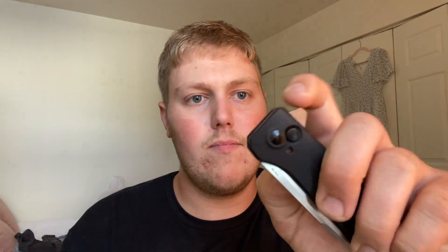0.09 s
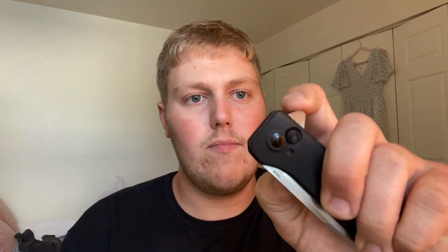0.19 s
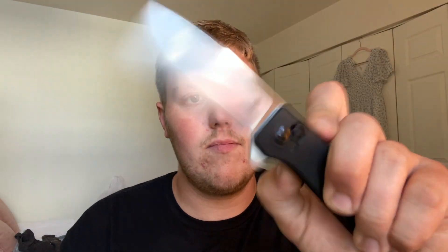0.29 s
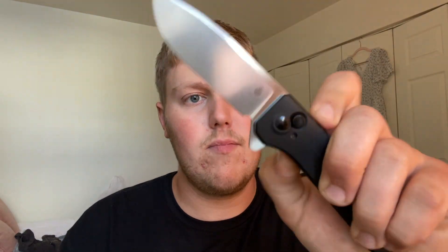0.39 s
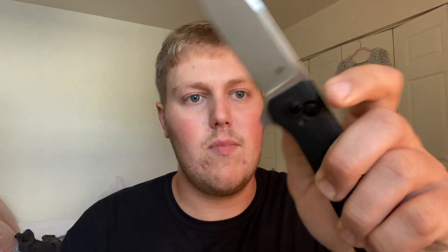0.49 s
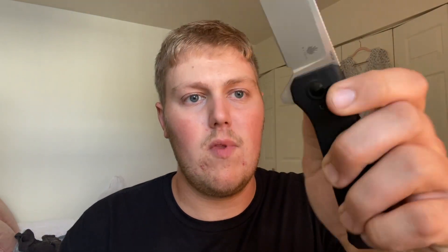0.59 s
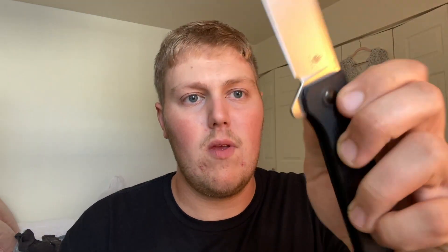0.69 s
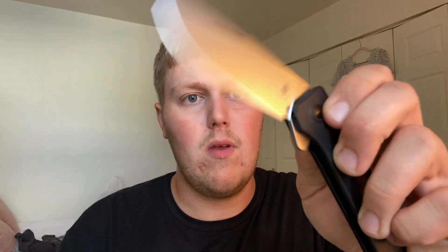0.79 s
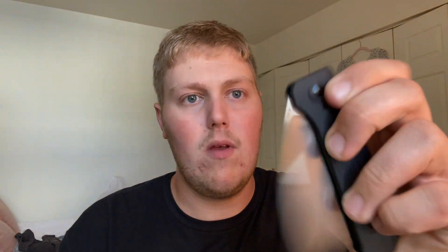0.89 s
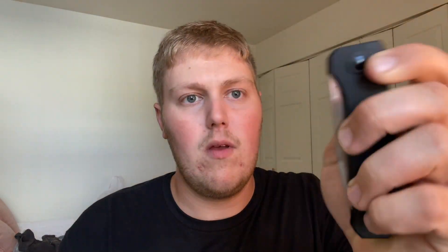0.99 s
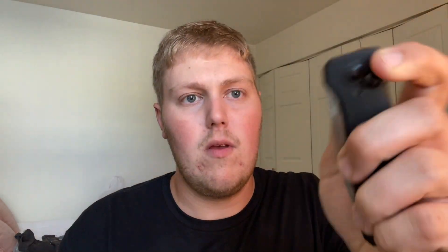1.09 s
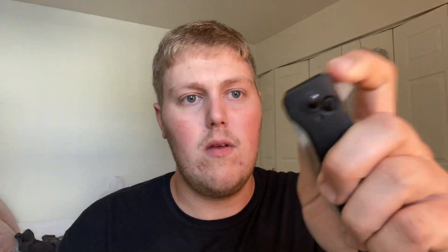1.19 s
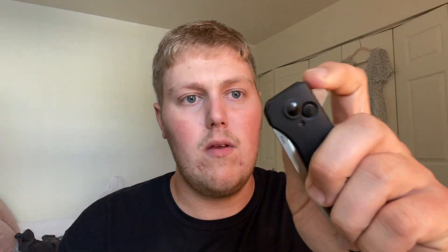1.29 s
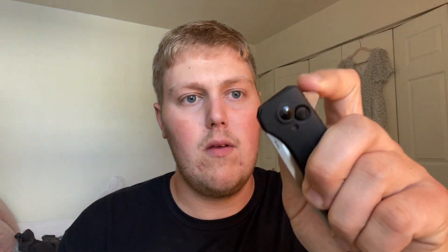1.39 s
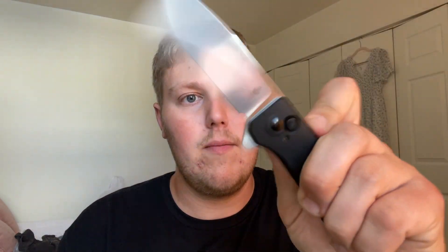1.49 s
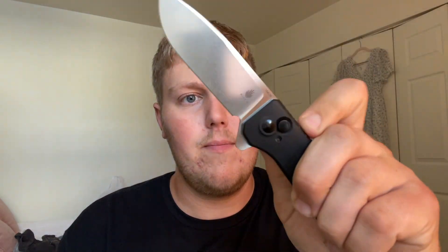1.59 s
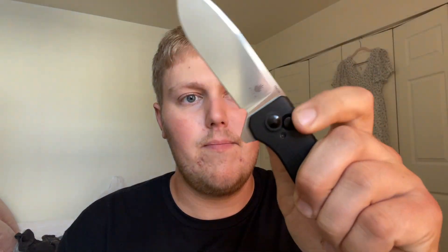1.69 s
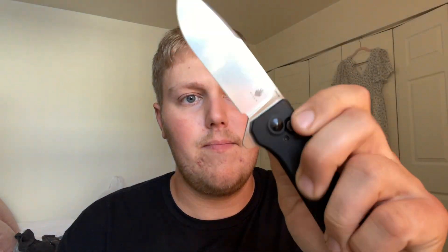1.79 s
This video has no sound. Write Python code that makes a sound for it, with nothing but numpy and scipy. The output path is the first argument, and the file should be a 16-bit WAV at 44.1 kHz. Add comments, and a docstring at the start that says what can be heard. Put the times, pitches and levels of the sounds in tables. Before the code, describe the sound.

Sharp steel clicks of a pocket knife snapping open, closing, then snapping open in a small room

```python
"""Fingers rub the handle of a folding knife, close by in a small room, and then the blade is flicked open.
The detent clicks free, the blade slides round its pivot and slams into the lock, and the knife rings.
The lock is pushed free with a click, the blade drops shut with a small rebound, and it is flicked open again.
Clicks are shaped noise bursts plus fading sine tones; rubbing and sliding are grainy noise; bumps are low tones.
A faint hum, rumble and hiss lie underneath throughout."""
import sys
import numpy as np
from scipy import signal
from scipy.fft import rfft, irfft
from scipy.io import wavfile
from scipy.ndimage import uniform_filter1d

SR = 44100
rng = np.random.default_rng(int(sys.argv[2]) if len(sys.argv) > 2 else 0)


def master_out(mix):
    """Clip the mix to full scale and print it as 16-bit PCM to the path in sys.argv[1]."""
    frames = np.transpose(np.atleast_2d(mix))
    ceiling = np.clip(frames, -1, 1)
    pcm = np.round(ceiling * 32767).astype(np.int16)
    wavfile.write(sys.argv[1], SR, pcm)


N = 79380  # length of the scene (samples)
HZ = np.fft.rfftfreq(2 * N, 1 / SR)  # frequencies of the filters
T = np.arange(SR * 3 // 4) / SR  # time inside one event (s)
CRACK_RISE_S, RING_RISE_S, RING_DELAY_S = 0.00071, 0.00084, 0.00017


def amp(db):
    """Turn decibels into a gain."""
    return 10 ** (np.asarray(db) / 20)


def along(points, hz):
    """Read a curve of (Hz, value) points, with straight lines on a log frequency axis."""
    f, v = np.transpose(points)
    return np.interp(np.log(hz + 1), np.log(f + 1), v)


def fade(t60, t=T):
    """Die away exponentially, by 60 dB in t60 seconds."""
    return 1000. ** (-t / t60)


def rise(rise_s):
    """Swell smoothly from silence to full level."""
    return 1 - np.exp(-(T / rise_s) ** 2)


def filtered(x, gain):
    """Multiply the spectrum of x by a frequency response."""
    return irfft(rfft(x, 2 * N) * gain)[..., :N]


def causal(db):
    """Make a minimum-phase filter with these levels, so that nothing sounds before the blow."""
    cepstrum = irfft(db * np.log(10) / 20)
    cepstrum[1:N] *= 2
    cepstrum[N + 1:] = 0
    return np.exp(rfft(cepstrum))


def noise(colour):
    """Make steady coloured noise of rms 1."""
    x = filtered(rng.standard_normal(N), amp(along(colour, HZ)))
    return x / x.std()


def add(track, s, x):
    """Mix x into the track at time s."""
    part = track[round(s * SR):][:len(x)]
    part += x[:len(part)]


def crack(colour, t60, tilt_db=0):
    """Make a contact: a burst of micro-impacts, with the energy of one millisecond at rms 1."""
    envelope = fade(t60) * rise(CRACK_RISE_S)
    burst = rfft(rng.standard_normal(len(T)) * envelope, 2 * N)
    # even out the random peaks of the spectrum, then colour it
    even = irfft(burst / np.sqrt(abs(burst) + 1e-9))[:len(T)]
    even = even * (envelope > 1e-4)
    tilt = tilt_db * np.log2((HZ + 200) / 8000)
    x = filtered(even, causal(along(colour, HZ) + tilt))
    return x / np.sqrt(np.sum(x ** 2) * 1000 / SR)


def ring(modes, rise_s, scatter_db=1):
    """Sum damped vibrations, neighbours in opposite phase, with levels a little different at each blow."""
    x = np.zeros(len(T))
    for k, (hz, db, t60) in enumerate(modes):
        level = amp(db + scatter_db * rng.standard_normal())
        x += (-1) ** k * level * fade(t60) * np.sin(2 * np.pi * hz * T)
    return x * rise(rise_s)


def slams(rows, colour, t60, modes):
    """Steel hits steel: a crack, and just after it the metal rings."""
    x = np.zeros(N)
    for s, crack_db, ring_db in rows:
        add(x, s, amp(crack_db) * crack(colour, t60))
        add(x, s + RING_DELAY_S, amp(ring_db) * ring(modes, RING_RISE_S))
    return x


def openings():
    """The lock bar catches, then the blade slams open into the lock and rings on."""
    # Each row: start in seconds, crack level in dB, ring level in dB.
    opens = [(0.2997, -9.5, -3.5), (1.501, -9.5, -4.5)]
    # Colour of the crack. Each row: frequency in Hz, relative level in dB.
    colour = [(150, -52.5), (450, -28), (1600, -10), (3200, 12.5), (3900, 6), (5200, -0.5), (6500, 6.5),
              (7500, 5.5), (9300, -1.5), (12000, 5.5), (13800, -1), (15500, -10.5), (16900, -24)]
    # Short tones of the open knife. Each row: frequency in Hz, relative level in dB, 60 dB decay in seconds.
    short_modes = [(480, -29, .012), (720, -25, .01), (1300, -21, .009), (2130, -16, .01), (3230, -1, .015),
                   (3440, -1, .014), (4420, -7, .011), (5060, -7, .01), (5750, -13, .012)]
    # Lasting tones of the open blade. Each row: frequency in Hz, level in dB relative to lasting_db.
    lasting = [(3212, 0), (3305, 0), (3390, -4), (3436, -2), (4173, -11), (4408, -6), (4914, -5),
               (5214, -11), (5830, -6), (8506, -12)]
    lasting_db, lasting_t60 = -40, 0.38
    crack_t60 = .011  # (s)
    lead_s, lead_db = .0015, -4  # the lock bar catches just before the blade meets its stop

    modes = short_modes + [(hz, db + lasting_db, lasting_t60) for hz, db in lasting]
    x = slams(opens, colour, crack_t60, modes)
    for s, crack_db, _ in opens:
        add(x, s - lead_s, amp(crack_db + lead_db) * crack(colour, crack_t60))
    return x


def shutting():
    """The blade drops into the handle and rebounds: two blows that ring the closed knife."""
    # Each row: start in seconds, crack level in dB, ring level in dB.
    shuts = [(.9224, -12.5, -9.5), (.9316, -27, -38)]
    # Colour of the crack. Each row: frequency in Hz, relative level in dB.
    colour = [(200, -34), (700, -18), (1500, -17), (3000, -10.5), (6000, 0.5), (9000, -0.5), (11000, 5),
              (13000, 1.5), (15300, -1.5), (17000, -23.5)]
    # Tones of the closed knife. Each row: frequency in Hz, relative level in dB, 60 dB decay in seconds.
    modes = [(1190, -24, .04), (1370, -36, .08), (2930, -6, .016), (3100, -7, .014), (3280, 1, .017),
             (5650, -10, .008), (2925, -40, .4), (3080, -39, .4), (3235, -37, .42), (3330, -40, .4)]
    return slams(shuts, colour, .009, modes)  # crack decay in seconds


def unlocking():
    """The lock bar is pushed free: a crack, and the bar rings in the open knife."""
    # Each row: start in seconds, crack level in dB, ring level in dB.
    unlocks = [(0.6951, -14, -13)]
    # Colour of the crack. Each row: frequency in Hz, relative level in dB.
    colour = [(200, -31.5), (1000, -35.5), (3000, -20.5), (5700, -19), (6600, -12.5), (8200, -13.5),
              (9400, -17.5), (10700, -3), (12300, -0.5), (13800, -17.5), (15100, -13), (16800, -42.5)]
    # Tones of the lock bar. Each row: frequency in Hz, relative level in dB, 60 dB decay in seconds.
    modes = [(637, -35.5, 0.024), (3125, -22, 0.058), (3360, -14.5, 0.022), (4650, -28, 0.03),
             (5960, -30, 0.0026), (15035, -24, .13)]
    return slams(unlocks, colour, .006, modes)  # crack decay in seconds


def catches():
    """Small clicks: a finger slips on the flipper, the detent lets go, its ball rides off the swinging blade."""
    # Flipper and detent. Each row: start in seconds, level in dB, handle knock in dB relative to that level,
    # treble tilt in dB per octave.
    ticks = [(0.2056, -42.5, -22, -6), (0.233, -17, -15, 1.5), (1.4098, -32, -32.5, -2.5),
             (1.4301, -20.5, -10.5, -0.5)]
    # Detent ball. Each row: start in seconds, level in dB.
    ball = [(0.2699, -31.5), (0.2735, -45.5), (1.4687, -30.5), (1.4726, -29.5)]
    # Colours of the two kinds of click. Each row: frequency in Hz, relative level in dB.
    tick_colour = [(120, -43.5), (320, -35), (1500, -40), (4000, -17.5), (6300, -7.5), (7400, 4.5),
                   (9000, -8.5), (11800, 2), (13800, -5.5), (15500, -13.5), (16900, -30)]
    ball_colour = [(400, -23.5), (2000, -17.5), (3200, 3.5), (5600, 2), (7000, -0.5), (8700, -4.5),
                   (12000, -11.5), (15000, -4.5), (17000, -33.5)]
    # Dull tones of the hand-held handle, and tones of the detent.
    # Each row: frequency in Hz, relative level in dB, 60 dB decay in seconds.
    handle_modes = [(600, -19, .014), (1250, -12, .01), (2100, 0, .011), (3220, -1, .014), (4450, 1, .012),
                    (5150, -3, .01), (7300, 4, .009)]
    ball_modes = [(3919, -12, 0.045), (5500, -2.5, .015), (9120, -14.5, .1)]
    tick_t60, ball_t60 = .0065, .016  # (s)

    x = np.zeros(N)
    for s, db, knock_db, tilt_db in ticks:
        add(x, s, amp(db) * crack(tick_colour, tick_t60, tilt_db))
        add(x, s, amp(db + knock_db) * ring(handle_modes, CRACK_RISE_S))
    for s, db in ball:
        add(x, s, amp(db) * crack(ball_colour, ball_t60))
        add(x, s, amp(db) * ring(ball_modes, CRACK_RISE_S))
    return x


def friction(grain_db=3):
    """Skin rubs on the handle and the blade slides round its pivot: noise with a random, grainy level."""
    # Finger rubs. Each row: middle in seconds, half length in seconds, level in dB.
    rub_rows = [(0.041, 0.03, -68.5), (0.636, 0.048, -63), (0.853, 0.043, -63.5), (1.122, 0.012, -64),
                (1.779, 0.024, -61.5)]
    # Blade slides. Each row: start in seconds, end in seconds, level in dB.
    swing_rows = [(0.227, 0.311, -54.5), (0.911, 0.943, -42), (1.422, 1.526, -52.5)]
    # Colours of the two noises. Each row: frequency in Hz, relative level in dB.
    rub_colour = [(300, -10.5), (2300, -17), (3300, 4), (5500, -13), (8000, -1.5), (10000, -6.5),
                  (12200, 0.5), (14000, -14.5), (15400, -8.5), (17000, -44.5)]
    swing_colour = [(400, -20.5), (2000, -9), (3200, 8), (6000, -23), (8600, -4), (10000, -13.5),
                    (12000, -9), (15500, -14), (17000, -38.5)]

    t = np.arange(N) / SR
    # a new random level 400 times a second
    grain = amp(grain_db * np.interp(t, np.arange(800) / 400, rng.standard_normal(800)))
    rubs = sum(amp(db) * np.exp(-((t - s) / half) ** 2) for s, half, db in rub_rows)
    swings = sum(amp(db) * ((t > start) & (t < end)) for start, end, db in swing_rows)
    swings = uniform_filter1d(swings, size=200)  # soften the ends
    return grain * (rubs * noise(rub_colour) + swings * noise(swing_colour))


def bumps():
    """Soft low thuds that go with the hand's movements: single damped tones that rise slowly."""
    # Each row: start in seconds, frequency in Hz, level in dB before the left-right balance,
    # 60 dB decay in seconds.
    bump_rows = [(0.304, 71.7, -66, 0.53), (0.694, 220, -51, .09), (.924, 137, -53.5, 0.74),
                 (.93, 72, -51.5, .2), (1.501, 85, -39, 0.096), (1.625, 49, -42.5, 0.16)]
    x = np.zeros(N)
    for s, hz, db, t60 in bump_rows:
        add(x, s, ring([(hz, db, t60)], rise_s=.012))
    return x


def background():
    """A low steady-pitched hum over rumble and hiss, which are low-heavy noise partly shared by both sides."""
    # Hum level. Each row: time in seconds, rms level in dB before the left-right balance.
    hum_level = [(0, -78.5), (.4, -70.5), (.9, -66), (1.0, -69), (1.2, -67.5), (1.8, -70.5)]
    # Colour of rumble and hiss. Each row: frequency in Hz, relative level in dB.
    floor_colour = [(20, -15.5), (42, 8), (68, 4), (100, -1), (200, -9.5), (400, -17), (800, -20),
                    (1600, -27), (3200, -30), (8000, -38), (13000, -40), (17000, -65.5)]
    hum_hz, hum_phase = 135.2, .7  # phase of right over left (rad)
    floor_db, side_db = -68, -1.5  # shared noise; opposite-sided noise relative to it

    t = np.arange(N) / SR
    level = np.sqrt(2) * amp(np.interp(t, *np.transpose(hum_level)))
    hum = level * np.sin(2 * np.pi * hum_hz * t + np.array([[0], [hum_phase]]))
    side = amp(side_db) * np.outer([1, -1], noise(floor_colour))
    return hum + amp(floor_db) * (noise(floor_colour) + side)


def room(x):
    """Dense early echoes from near walls, then a diffuse tail: fading noise, different on each side."""
    # Decay of the tail. Each row: frequency in Hz, 60 dB decay in seconds.
    decay = [(200, .4), (1200, .5), (3300, 0.41), (6000, 0.48), (12000, .36), (16000, 0.69)]
    # Colour of the echoes. Each row: frequency in Hz, gain in dB.
    colour = [(200, -0.5), (900, 1.5), (1350, 1), (2400, -1), (3300, 0.5), (5000, 4.5), (6600, -5.5),
              (8500, -1), (12800, -7), (14300, -16), (17000, -18)]
    level_db, early_db, early_t60, onset_s = -10, 9, 0.1, .007

    # let each frequency band of the noise fade at its own rate
    hz, t, bands = signal.stft(rng.standard_normal((2, len(T))), SR, nperseg=256)
    bands = bands * fade(along(decay, hz)[:, None], t)
    tail = signal.istft(bands, SR, nperseg=256)[1][:, :len(T)]
    tail = tail * (1 + amp(early_db) * fade(early_t60)) * rise(onset_s)
    wet = signal.fftconvolve(x[None], tail / np.linalg.norm(tail[0]), axes=1)[:, :N]
    return amp(level_db) * filtered(wet, amp(along(colour, HZ)))


def near(x):
    """The knife is close and off centre: left and right hear it with different phase and level."""
    # Each row: frequency in Hz, phase of left over right in radians.
    phase = [(0, 0), (600, .9), (2100, 1), (2650, 2.6), (3300, 2.3), (4450, 1.7), (5100, -1), (5600, -2.3),
             (6500, -3.14), (7500, -5.1), (10300, -9.42), (14000, -15.7), (17500, -21)]
    # Each row: frequency in Hz, level of left over right in dB.
    pan = [(600, 0), (1300, 4), (2100, 0), (3300, 3.5), (4500, 5), (6000, 2), (9000, 0), (15000, -1)]
    # half of each difference goes to either side
    turn = np.exp(.5j * np.interp(HZ, *np.transpose(phase))) * amp(along(pan, HZ) / 2)
    return filtered(x, np.array([turn, 1 / turn]))


def placed(x, room_db):
    """Add the room's answer, raised by room_db, to the direct sound."""
    return near(x) + amp(room_db) * room(x)


def scene():
    """Mix the knife in its room with the hand's bumps and the background."""
    knife = placed(openings(), room_db=0.5)
    knife = knife + placed(shutting(), room_db=0.0)
    knife = knife + placed(unlocking(), room_db=0.9)
    knife = knife + placed(catches(), room_db=0.5)
    knife = knife + placed(friction(), room_db=5)
    balance = amp([[1.4], [-1.4]])  # left up, right down (dB)
    return knife + (bumps() + background()) * balance


def record(dry):
    """Round off peaks near full scale and keep nothing from 17 kHz up."""
    rounded = dry / (1 + dry ** 6) ** (1 / 6)
    return filtered(rounded, HZ < 17000)


dry = scene()
out = record(dry)
master_out(out)
```